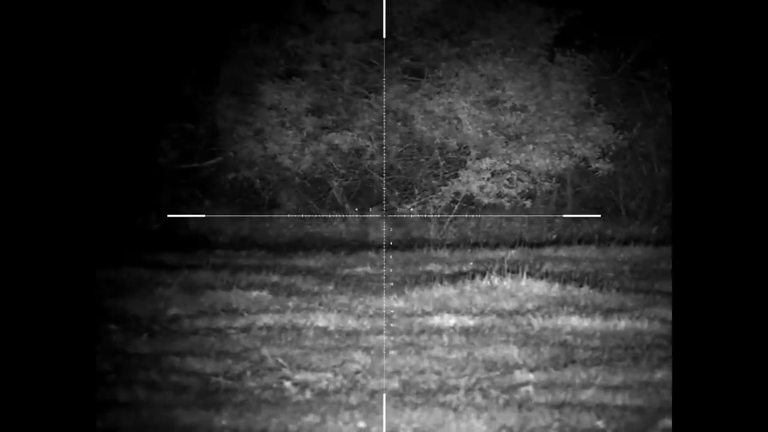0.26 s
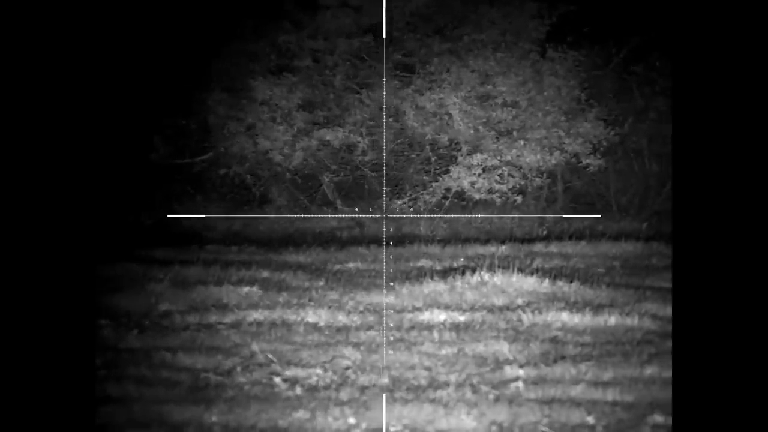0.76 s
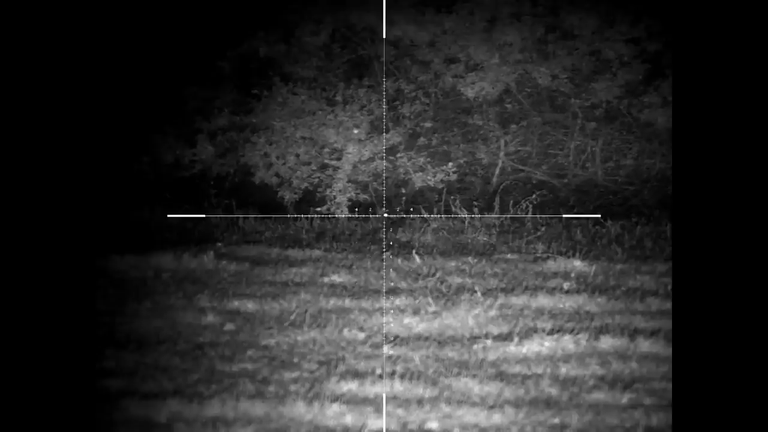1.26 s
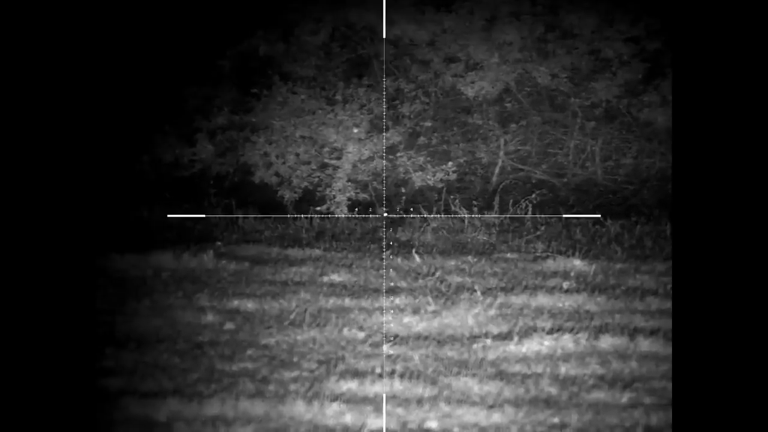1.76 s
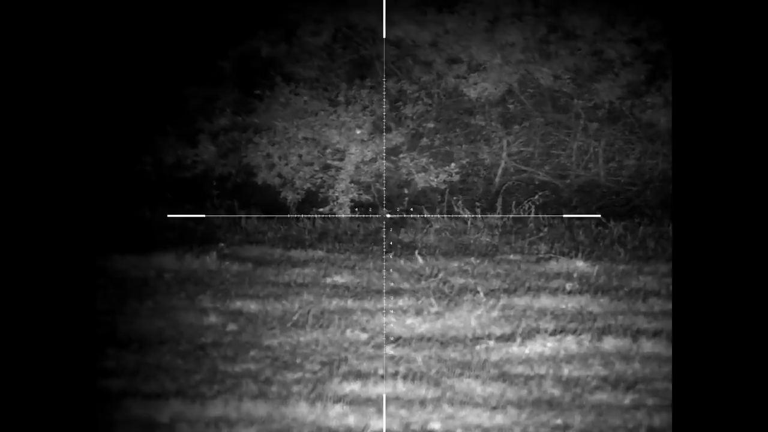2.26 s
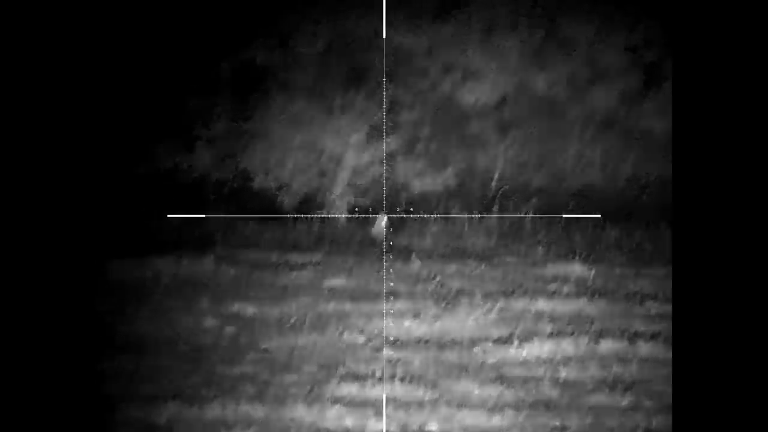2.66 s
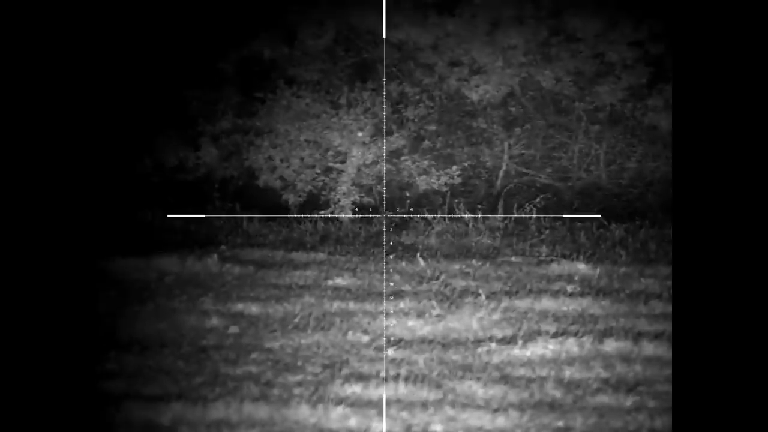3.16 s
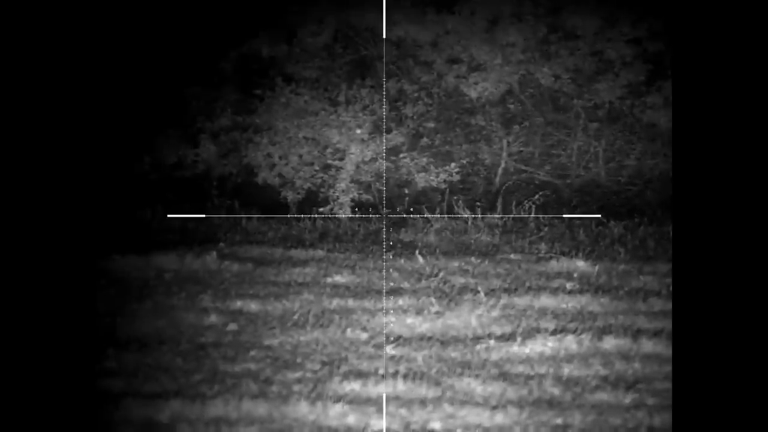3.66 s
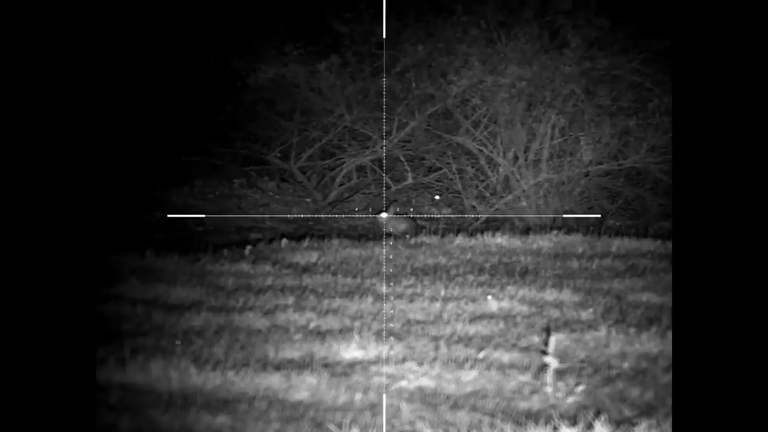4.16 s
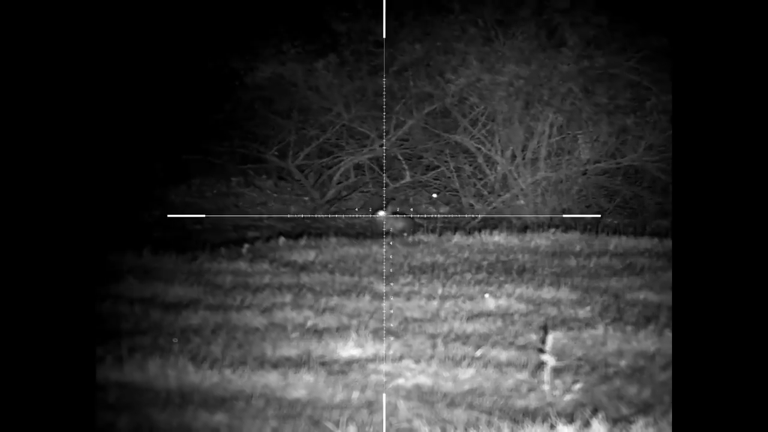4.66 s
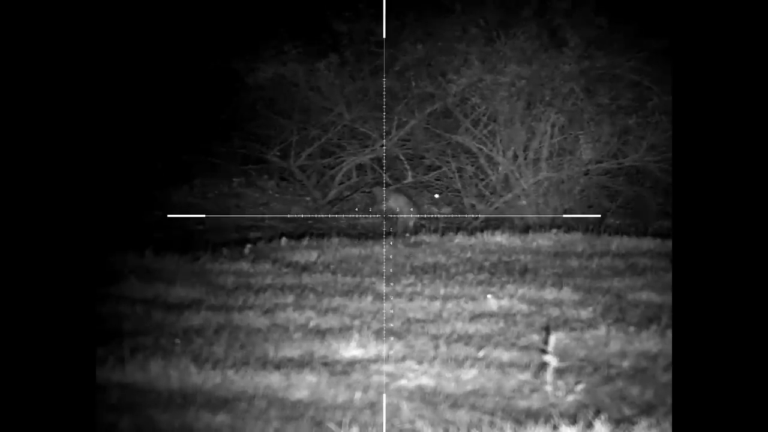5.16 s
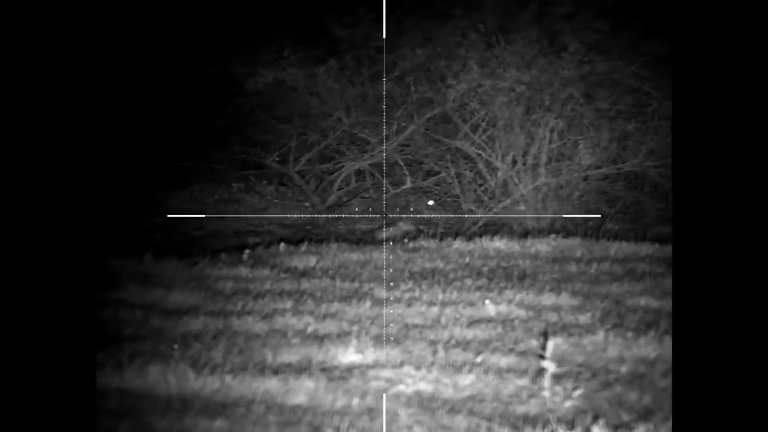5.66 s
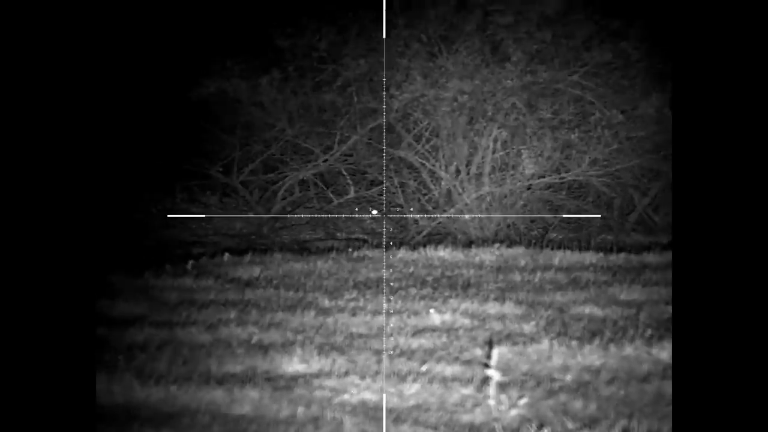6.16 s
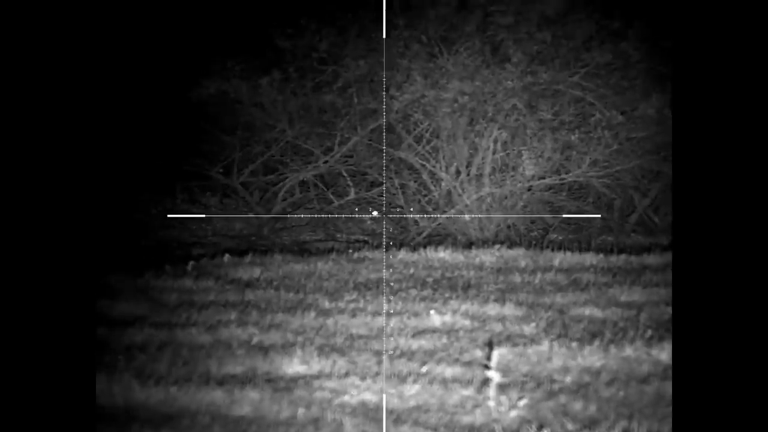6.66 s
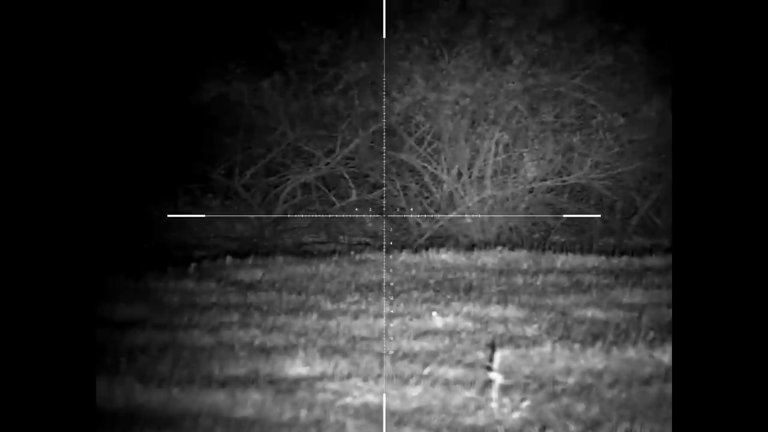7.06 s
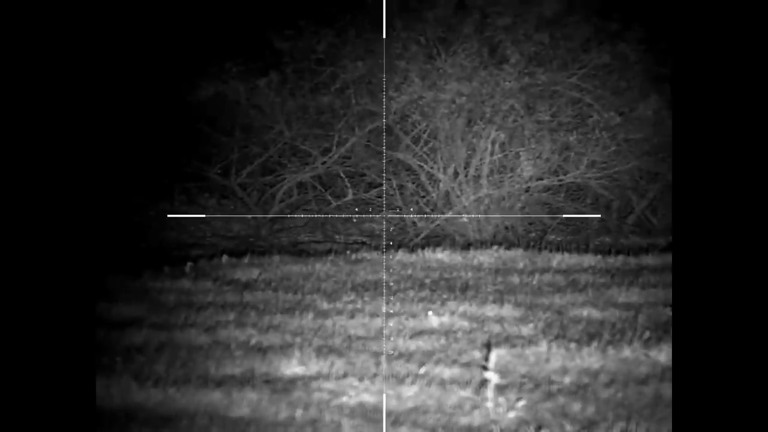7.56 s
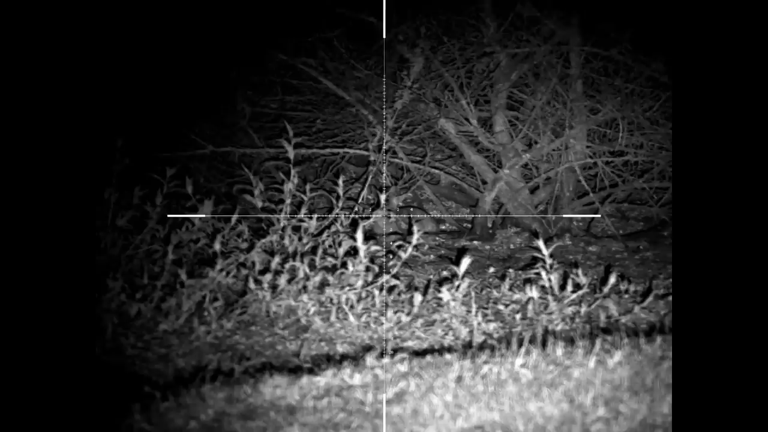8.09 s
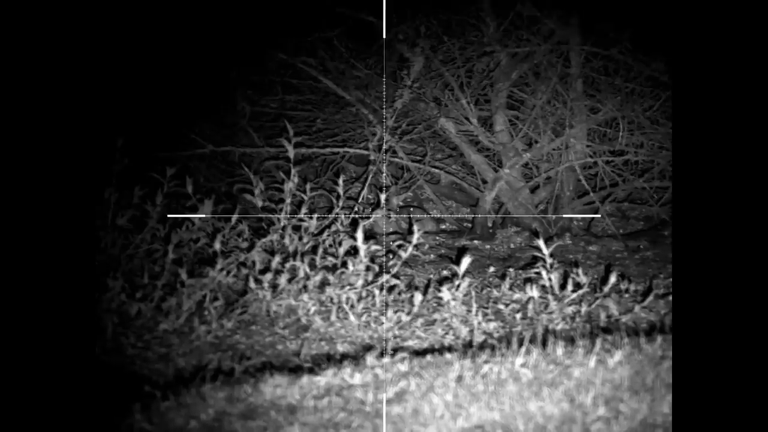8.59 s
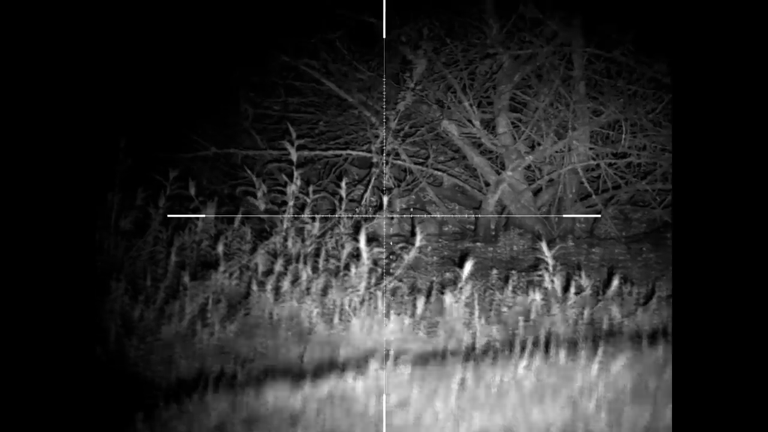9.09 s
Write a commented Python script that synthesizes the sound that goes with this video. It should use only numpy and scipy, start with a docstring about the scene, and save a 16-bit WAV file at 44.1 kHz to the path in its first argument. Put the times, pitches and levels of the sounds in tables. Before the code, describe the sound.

Outdoors on a still night, heard from a microphone fixed to an air rifle. At 0 s the tail of a shot already fired is fading: a hollow ping, thin steel ringing and hissing air, cut off near 1.1 s. Low, soft air noise and a barely audible electronic whine remain. At 2.7 s comes a loud, dry, overloaded crack of hammer and valve, with clatter, a brief rub, ringing and a surge of hiss, which stops abruptly at 3.8 s. A second shot at 4.9 s has extra rattling rebounds and rubbing, then faint finger taps around 5.6 s; its tail ends at 5.9 s. A duller, fainter hiss follows, with one clearer tap at 6.15 s. The third shot strikes at 6.9 s, with rebounds and a rub, ringing until 8.15 s. After a quiet second, the last shot cracks at 9.2 s, its stronger hiss and metallic ring running to the end.

```python
"""A pre-charged air rifle fires at night, heard by a microphone fixed to the gun.
Each shot sums damped modes of the struck action, spring and steel, a decaying tube ping, a pressure
pulse and valve noise; filtered noise gives clatter and rubbing. The tail of one shot opens the scene, four
more follow, and all but the last tail stop at a splice. Still air and an electronic whine lie beneath.
The recorder ducks its gain late, recovers steadily and overloads; the level and the treble dip briefly."""
import sys
import numpy as np
from scipy import signal
from scipy.fft import rfft, irfft, next_fast_len
from scipy.io import wavfile
from scipy.ndimage import uniform_filter1d

SR = 44100
rng = np.random.default_rng(int(sys.argv[2]) if len(sys.argv) > 2 else 0)


def dump_mix(stems):
    """Bounce the given channels to the path in sys.argv[1] as a 16-bit WAV at rate SR."""
    frames = np.atleast_2d(stems).T  # one column per channel
    limited = np.clip(frames, -1, 1)  # hard clip at full scale
    pcm = np.round(limited * 32767).astype(np.int16)
    wavfile.write(sys.argv[1], SR, pcm)


def how_loud(loudness_db):
    """Turn decibels into a plain amplitude multiplier (0 dB gives 1, 20 dB gives 10)."""
    steps = np.asarray(loudness_db, float) / 20
    return 10 ** steps


N = 411453
LEAD = SR // 2  # samples of run-up, so that the first tail and the gain are already under way
M = N + LEAD


def evened(x):
    """Power normalisation: scales a signal to rms 1."""
    return x / np.sqrt(np.mean(x ** 2) + 1e-20)


def add(mix, s, sound):
    """Superposition: mixes a sound in at time s."""
    part = mix[LEAD + round(s * SR):][:len(sound)]
    part += sound[:len(part)]


def coloured(length, peaks):
    """Spectral shaping: white noise takes the summed power response of steep resonances, at rms 1."""
    hz = np.fft.rfftfreq(length, 1 / SR)
    power = 0
    for centre, width, db in peaks:
        power = power + how_loud(db) ** 2 / (1 + (2 * (hz - centre) / width) ** 2) ** 2
    white = rfft(rng.standard_normal(length))
    return evened(irfft(white * np.sqrt(power), length))


def ring(modes, t, colour_db=0, detune=0.):
    """Modal superposition: an impulse starts every mode at once, and each decays exponentially."""
    hz, db, t60 = np.transpose(modes)
    hz = hz * (1 + detune * rng.standard_normal(len(hz)))
    sign = rng.choice([-1., 1.], len(hz))
    decay = how_loud(-60 * t / t60[:, None])
    return (sign * how_loud(db + colour_db)) @ (decay * np.sin(2 * np.pi * hz[:, None] * t))


# Spectrum of the still air and microphone noise.
# Each row: frequency in Hz, relative density in dB per Hz.
NIGHT_SPECTRUM = [(12, -29.5), (20, -3), (219, -4.5), (404, -7.5), (439, -8.5), (549, -9), (3540, -24),
                  (4180, -27), (7510, -31.5), (8160, -32.5), (15500, -35)]
# Electronic whine. Each row: frequency in Hz, rms level in dB.
WHINE_TONES = [(4032, -85.5), (8064, -85.5)]
NIGHT_DB = -62.5  # rms level of the noise


def night():
    """Stationary noise: still air and microphone noise with a faint electronic whine of steady sines."""
    size = next_fast_len(M)
    hz = np.fft.rfftfreq(size, 1 / SR)
    corner_hz, db = np.transpose(NIGHT_SPECTRUM)
    colour = how_loud(np.interp(np.log(hz + 1), np.log(corner_hz + 1), db))
    hush = evened(irfft(rfft(rng.standard_normal(size)) * colour, size))[:M]
    t = np.arange(M) / SR
    whine = sum(np.sqrt(2) * how_loud(db) * np.sin(2 * np.pi * hz * t) for hz, db in WHINE_TONES)
    return how_loud(NIGHT_DB) * hush + whine


# Modes of the action and stock, before contact colour and extra damping.
# Each row: frequency in Hz, level in dB, decay time t60 in seconds.
ACTION_MODES = [(652.7, -0.5, 0.064), (1080, -12.5, 0.046), (1648, -11.5, 0.061), (1920, -8.5, .03),
                (2349, -1.5, .03), (2784, -12.5, .03), (3384, -8.5, 0.03), (3683, -10.5, 0.025),
                (3800, -2.5, 0.027), (3980, -12, .04), (4321, -16, 0.077), (5550, -15, 0.031),
                (5860, -11.5, 0.087), (6514, -9.5, 0.061), (7110, -7.5, 0.033), (7780, -14.5, 0.084),
                (7960, -15, 0.086), (10600, -22.5, 0.044), (12300, -27, .04)]
RATTLE_DB, RATTLE_T60 = -13, 0.071  # relative to the blow; t60 in s, before extra damping
FREE_T60, HELD_T60 = 3., .05  # s, extra damping of the action, free and held


def knock(db, hz, octaves, damping_t60):
    """Impact excitation: a blow favours the modes near its contact colour and rattles briefly."""
    t = np.arange(SR // 4) / SR
    mode_hz = np.transpose(ACTION_MODES)[0]
    colour_db = -6 * (np.log2(mode_hz / hz) / octaves) ** 2
    rattle = coloured(len(t), [(hz, hz * octaves, 0)]) * how_loud(RATTLE_DB - 60 * t / RATTLE_T60)
    onset = np.minimum(t / .0008, 1)
    body = (ring(ACTION_MODES, t, colour_db, detune=0.0072) + rattle) * onset
    return how_loud(db - 60 * t / damping_t60) * body


# Blows common to every shot: hammer let go, valve struck, valve shut, hammer bounce.
# Each row: seconds after the shot, level in dB, centre of the contact colour in Hz, spread in octaves.
FIRING_BLOWS = [(-.0051, 2, 3915, .83), (.0001, 11.5, 2602, 2.5), (.0034, 9.5, 2300, .6),
                (0.0125, 11, 2328, .85)]


def firing(mix, s):
    """Successive impacts: hammer and valve knock the action alike at every shot."""
    for wait, *blow in FIRING_BLOWS:
        add(mix, s + wait, knock(*blow, FREE_T60))


PUSH_S, PUSH_LEAD_S = .009, .003  # length of the puff, and its head start on the shot
SWING_DB = 6.5  # of the swing terms, relative to the puff
DIP_S, REBOUND_S, REBOUND_SHARE = .024, .047, .39  # decay constants, and rebound relative to dip


def push(db):
    """Pressure pulse: a puff of air, then a dip of pressure that swings back beyond rest."""
    t = np.arange(SR // 2) / SR
    puff = np.sin(np.pi * np.minimum(t / PUSH_S, 1)) ** 2
    late = np.maximum(t - PUSH_S / 2, 0)
    swing = REBOUND_SHARE * np.exp(-late / REBOUND_S) - np.exp(-late / DIP_S)
    onset = np.minimum(late / PUSH_S, 1) ** 2
    return how_loud(db) * (puff + how_loud(SWING_DB) * onset * swing)


def tube_ping(t, hz, db):
    """Air-column resonance: a single mode, damped ever faster by the returning air flow."""
    damping_db = 60 * t / .75 + 60 * (t / .35) ** 2
    return how_loud(db - damping_db) * np.sin(2 * np.pi * hz * t)


# Modes of the hammer spring. Each row: frequency in Hz, level in dB, decay time t60 in seconds.
SPRING_MODES = [(3780, -8.5, 0.25), (3816, -8, 0.24), (3690, -13, 0.18), (8500, -26.5, .12),
                (8840, -26, 0.19)]


def spring_ring(t):
    """Free vibration: the hammer spring rings in its decaying modes."""
    return ring(SPRING_MODES, t, detune=0.0018)


# Modes of the barrel and steel parts.
# Each row: frequency in Hz, level in dB relative to the whole ring, decay time t60 in seconds.
STEEL_MODES = [(1647, 4, 0.95), (1806, -21, .9), (1954, -11, .55), (2440, -14, .6), (2923, -22, 1.1),
               (3521, -14, 0.49), (3817, -9, .45), (4690, -17, .55), (5835, -20, .55), (7164, -18, .75),
               (7179, -21, .6)]


def steel_ring(t, db, swell_s):
    """Gradual energy transfer: the steel takes up its ring over the swell time, then decays."""
    swell = (1 - np.exp(-t / swell_s)) ** 2
    return how_loud(db) * swell * ring(STEEL_MODES, t, detune=0.00062)


# Resonances of the air passing the valve.
# Each row: centre in Hz, width in Hz, relative level in dB.
VALVE_PEAKS = [(300, 1500, -2), (1800, 430, -6), (2360, 190, -2), (3450, 320, -3), (3800, 60, 4),
               (7500, 300, -19), (8430, 170, -12), (4000, 21000, -22)]
SURGE_DB, SURGE_T60, SETTLED_T60 = 17.5, 0.83, 14  # surge relative to the settled flow; t60 in s


def refill_hiss(t, db):
    """Turbulent flow noise: the refilling air surges through the valve, then settles slowly."""
    flow = how_loud(SURGE_DB - 60 * t / SURGE_T60) + how_loud(-60 * t / SETTLED_T60)
    return how_loud(db) * flow * coloured(len(t), VALVE_PEAKS)


GRIP_DB = 2.5  # rms unevenness of the friction


def patchy(length, peaks):
    """Modulated friction noise: each resonance flutters on its own."""
    flutter = uniform_filter1d(rng.standard_normal((len(peaks), SR)), 220)
    grip_db = GRIP_DB * evened(flutter)
    noise = 0
    for (hz, width, db), g in zip(peaks, grip_db):
        noise = noise + np.sqrt(width) * how_loud(db + g) * coloured(SR, [(hz, width, 0)])
    return evened(noise)[:length]


# Resonances of the gun under friction, body and treble.
# Each row: centre in Hz, width in Hz, relative level in dB before weighting by the root of the width.
BODY_PEAKS = [(1820, 400, -3.5), (2450, 150, -2.5), (2830, 360, -11), (3500, 470, -5.5), (3860, 130, 3),
              (4600, 490, -12)]
TREBLE_PEAKS = [(6550, 280, 2), (8866, 600, 1.5), (8700, 7900, -8.5)]
FADE_IN, FADE_OUT = 0.067, 0.41  # shares of the length


def scrape(length, body_db, treble_db, body_fall_db, treble_fall_db):
    """Friction excitation: uneven noise sounds through the gun and falls steadily in dB."""
    u = np.linspace(0, 1, round(length * SR))
    body = how_loud(body_db - body_fall_db * u) * patchy(len(u), BODY_PEAKS)
    treble = how_loud(treble_db - treble_fall_db * u) * patchy(len(u), TREBLE_PEAKS)
    fade = np.minimum(1, np.minimum(u / FADE_IN, (1 - u) / FADE_OUT)) ** 2
    return (body + treble) * fade


def clatter():
    """Dense impacts as noise: loose parts clatter, and the treble dies faster than the body."""
    length = 0.11  # s
    body_rate, treble_rate = 330.5, 559.5  # fall in dB per s
    return scrape(length, -7.5, -4.5, body_rate * length, treble_rate * length)


# The shots. Each row: start in seconds, push of air in dB, tube pitch in Hz, tube ping in dB,
# steel ring in dB, steel swell time in seconds, level of the settled refill hiss in dB.
SHOT_ROWS = [(-.27, -6.5, 1250, -5, -32.5, .04, -59.5), (2.726, -6.5, 1260, -4.5, -29.5, .045, -59.5),
             (4.906, -4, 1264, -3.5, -35, .09, -60.5), (6.893, -10.5, 1261, -4, -27.5, .05, -58),
             (9.217, -15, 1262, -2.5, -31.5, 0.051, -51)]
# Ends of the shot tails at the splices. Each entry: time in seconds.
TAIL_ENDS = [1.072, 3.805, 5.937, 8.155, 9.9]
CLATTER_WAIT_S = .007  # after the shot


def shots(mix):
    """Superposed sources: blows, push, ping, rings, hiss and clatter make up each shot."""
    for row, end in zip(SHOT_ROWS, TAIL_ENDS):
        s, push_db, tube_hz, ping_db, steel_db, swell_s, hiss_db = row
        t = np.arange(round((end - s) * SR)) / SR
        firing(mix, s)
        add(mix, s - PUSH_LEAD_S, push(push_db))
        add(mix, s, tube_ping(t, tube_hz, ping_db))
        add(mix, s, spring_ring(t))
        add(mix, s, steel_ring(t, steel_db, swell_s))
        add(mix, s, refill_hiss(t, hiss_db))
        add(mix, s + CLATTER_WAIT_S, clatter())


# Stray rebounds of loose parts.
# Each row: start in seconds, level in dB, centre of the contact colour in Hz, spread in octaves.
REBOUNDS = [(2.7632, -23, 3800, .6), (4.9150, 4, 1983, 1.1), (4.9325, -4.5, 3800, .55),
            (6.9022, 0, 3500, 1.5), (6.931, 2.2, 2430, 0.54)]


def rebounds(mix):
    """Secondary impacts: loose parts strike the free action."""
    for s, *blow in REBOUNDS:
        add(mix, s, knock(*blow, FREE_T60))


# Cloth and hand rubbing on the gun. Each row: start in seconds, length in seconds,
# initial body level in dB, initial treble level in dB, fall over the length in dB.
RUB_ROWS = [(2.789, 0.15, -23, -37.5, 21.5), (4.976, 0.071, -27, -37, 6), (5.023, .18, -27.5, -40.5, 19.5),
            (5.679, .082, -59.5, -65.5, -3), (6.954, 0.075, -20.5, -31.5, 12),
            (9.281, 0.067, -23.5, -31.5, 21)]


def rubs(mix):
    """Sliding friction: cloth and hand rub on the gun, body and treble falling together."""
    for s, length, body_db, treble_db, fall_db in RUB_ROWS:
        add(mix, s, scrape(length, body_db, treble_db, fall_db, fall_db))


# Fingers tapping the held gun.
# Each row: start in seconds, level in dB, centre of the contact colour in Hz, spread in octaves.
TAP_ROWS = [(5.604, -43.5, 2400, 0.71), (5.622, -61, 3000, 0.89), (5.6482, -43, 1300, 1.3),
            (6.153, -31.5, 2770, 1.13)]


def taps(mix):
    """Damped impacts: fingers tap the gun while the hold on it shortens its ring."""
    for s, *blow in TAP_ROWS:
        add(mix, s, knock(*blow, HELD_T60))


# Resonances of a fainter, duller hiss. Each row: centre in Hz, width in Hz, relative level in dB.
FAINT_PEAKS = [(3320, 670, -1.5), (810, 2700, 1), (5830, 11000, -12)]


def faint_hiss(mix):
    """Steady resonant noise: a fainter, duller hiss between two shots."""
    start, end, db = 5.937, 6.888, -69  # s, s, rms level
    add(mix, start, how_loud(db) * coloured(round((end - start) * SR), FAINT_PEAKS))


def scene():
    """Linear superposition: everything that reaches the microphone, with the run-up in front."""
    mix = night()
    shots(mix)
    rebounds(mix)
    rubs(mix)
    taps(mix)
    faint_hiss(mix)
    return mix[None]


def gain_control(x):
    """Dynamic compression: the gain reacts late to loud sound and recovers steadily."""
    power_db = 10 * np.log10(uniform_filter1d(x ** 2, 200) + 1e-12)
    wanted_db = np.clip(power_db + 20, 0, 22)  # reduction above -20 dB, at most 22 dB
    rise = np.arange(M) * 110. / SR  # recovery of 110 dB per s
    held_db = np.maximum.accumulate(wanted_db + rise) - rise
    lag = np.exp(-1 / (0.016 * SR))  # time constant 16 ms
    return x / how_loud(signal.lfilter([1 - lag], [1, -lag], held_db))


def overload(x):
    """Saturation: the amplitude bends sharply into a ceiling."""
    knee = 4.5
    return 0.76 * np.tanh((abs(x) / 0.69) ** knee) ** (1 / knee) * np.sign(x)


# Brief dips of the level. Each row: start in seconds, length in seconds, gain in dB.
DIPS = [(1.068, .008, -8), (3.8042, .013, -30), (5.9042, .0065, -30), (8.1542, .006, -30)]


def level_dips(x, t):
    """Gated attenuation: the level dips briefly."""
    for s, length, db in DIPS:
        x = x * np.where((t > s) & (t < s + length), how_loud(db), 1)
    return x


def dull_spans(x, t):
    """Low-pass filtering: the treble vanishes around each shot and the sharpest tap."""
    spans = [(s - .019, s + .015) for s, *_ in SHOT_ROWS] + [(6.145, 6.175)]  # s
    inside = sum(1. * ((t > start) & (t < end)) for start, end in spans)
    dull = uniform_filter1d(inside, 64)
    lowpass = signal.firwin(255, 8800, window=("kaiser", 8), fs=SR)
    low = signal.oaconvolve(x, lowpass, "same")
    return x + dull * (low - x)


def top_cut(x):
    """Nothing passes above the cut-off."""
    return signal.sosfilt(signal.butter(12, 15630, fs=SR, output="sos"), x)


def record(dry):
    """Signal chain: gain control, overload, brief dips of level and treble, then a band limit."""
    t = (np.arange(M) - LEAD) / SR
    x = overload(gain_control(dry[0]))
    x = dull_spans(level_dips(x, t), t)
    x = signal.oaconvolve(x, signal.firwin(127, 15300, fs=SR), "same")  # cutoff in Hz
    finished = x[None, LEAD:]
    return top_cut(finished)


dry = scene()
out = record(dry)
dump_mix(out)
```